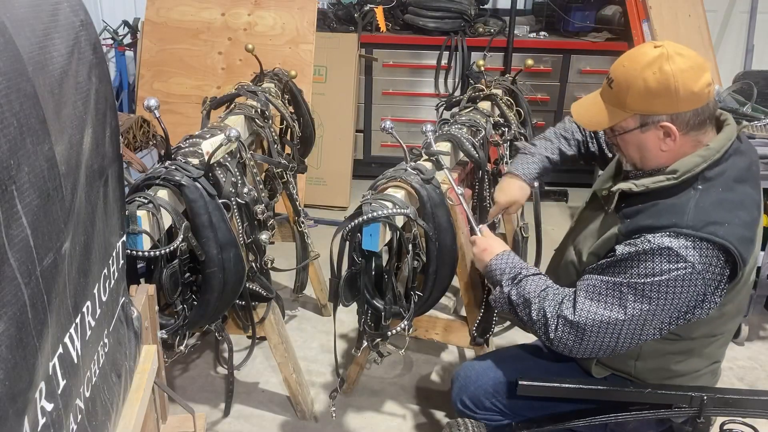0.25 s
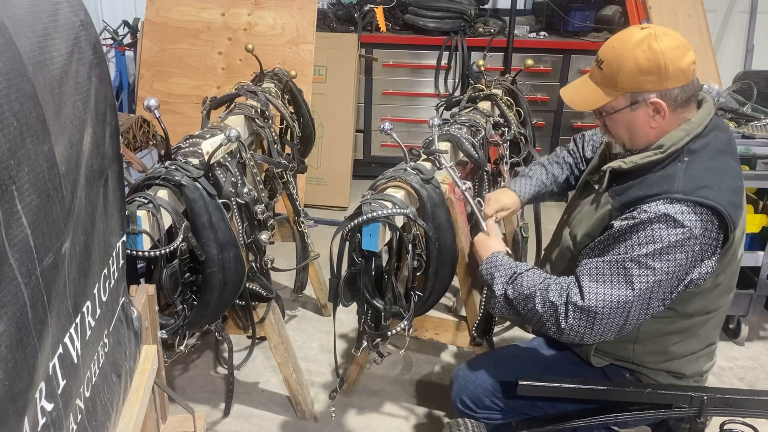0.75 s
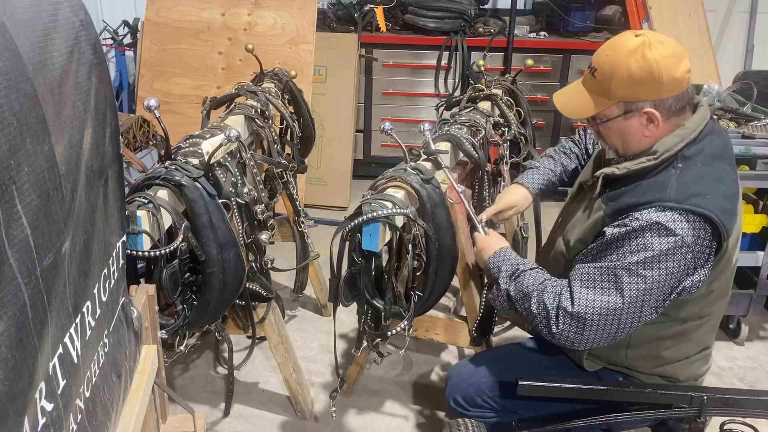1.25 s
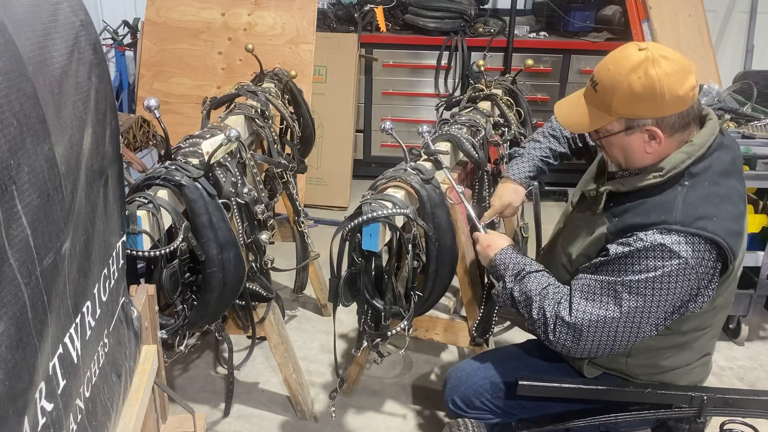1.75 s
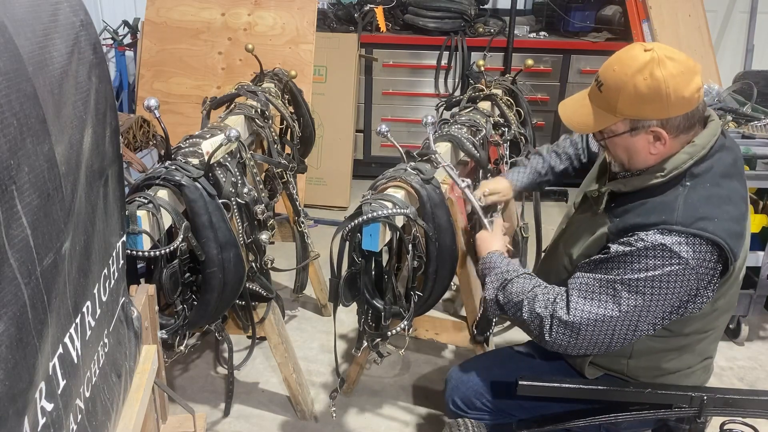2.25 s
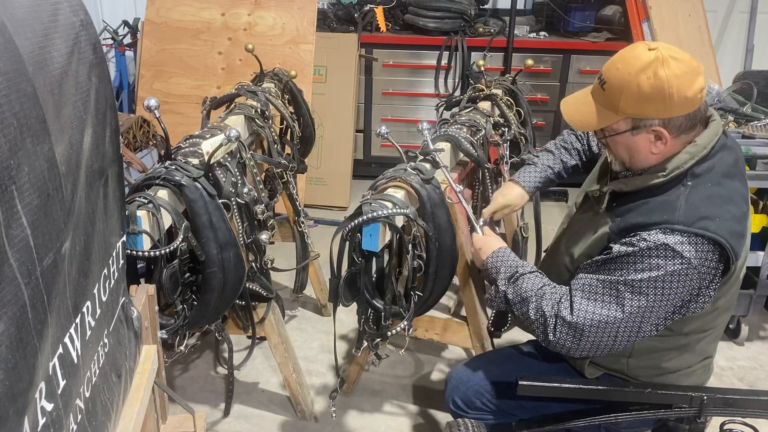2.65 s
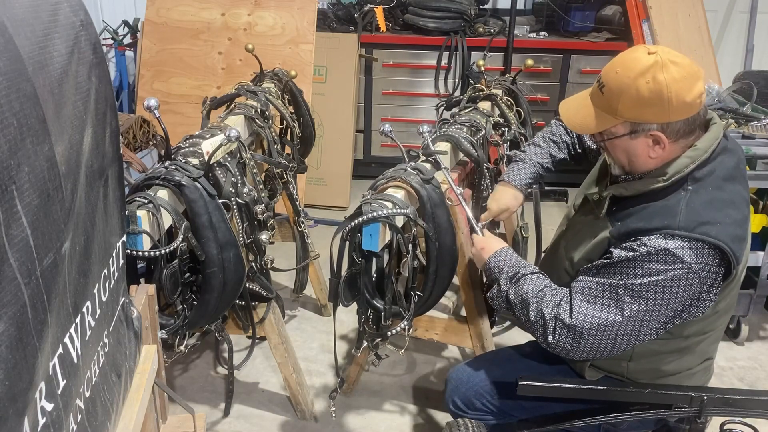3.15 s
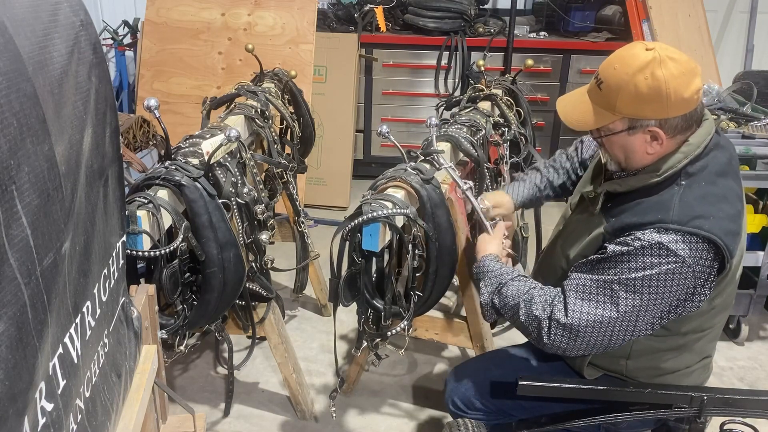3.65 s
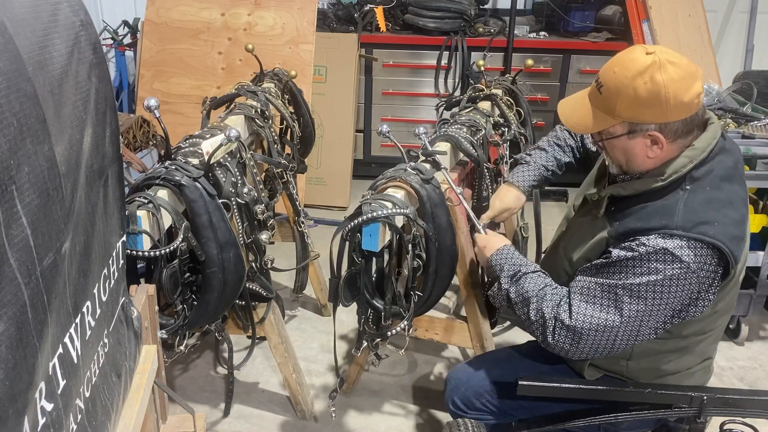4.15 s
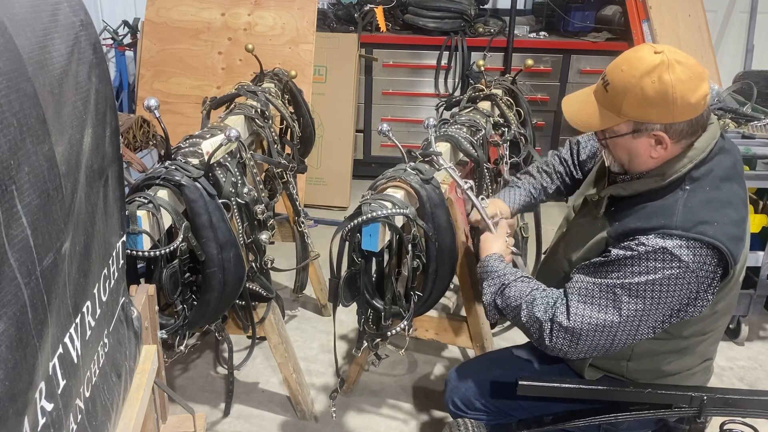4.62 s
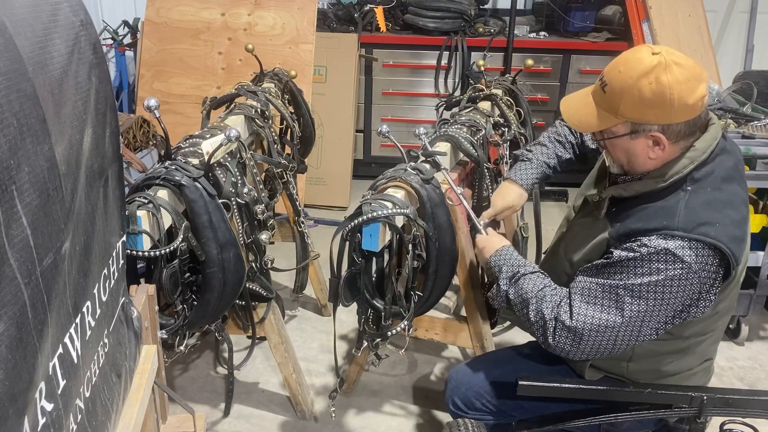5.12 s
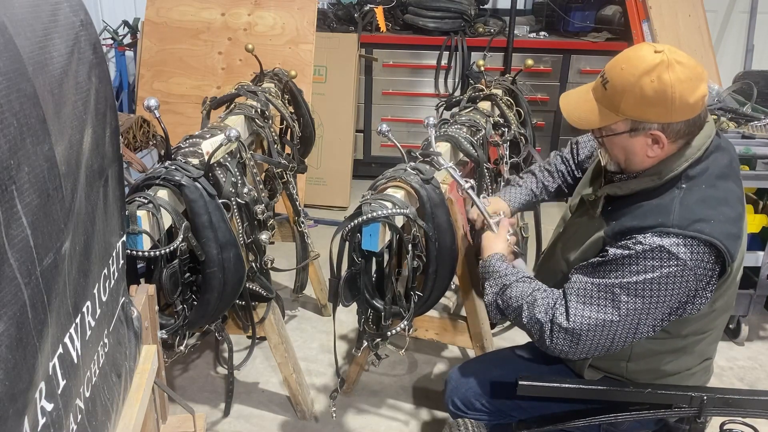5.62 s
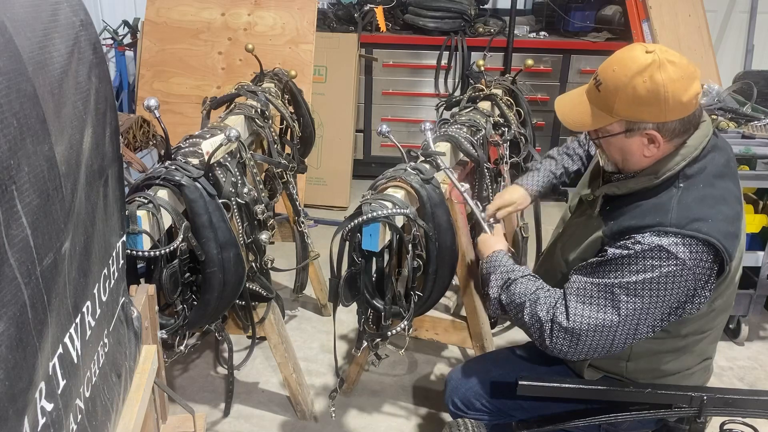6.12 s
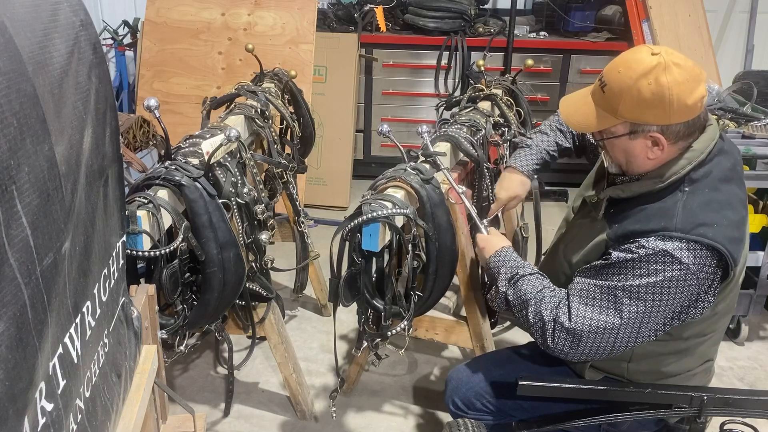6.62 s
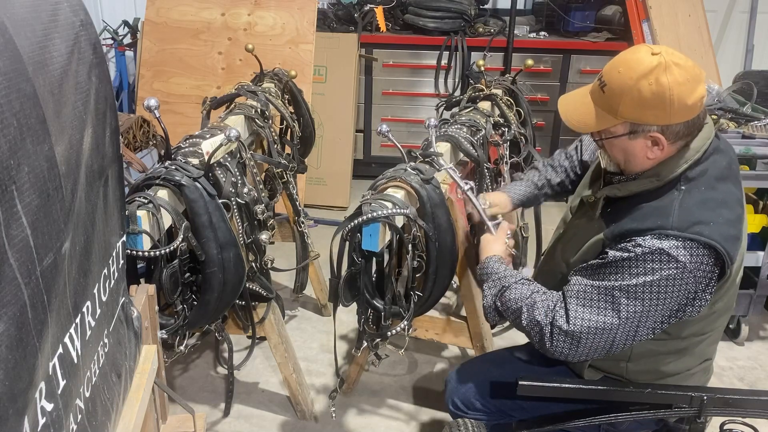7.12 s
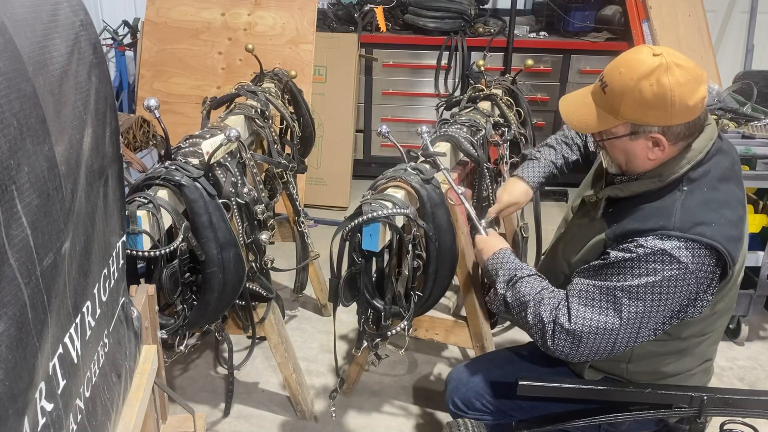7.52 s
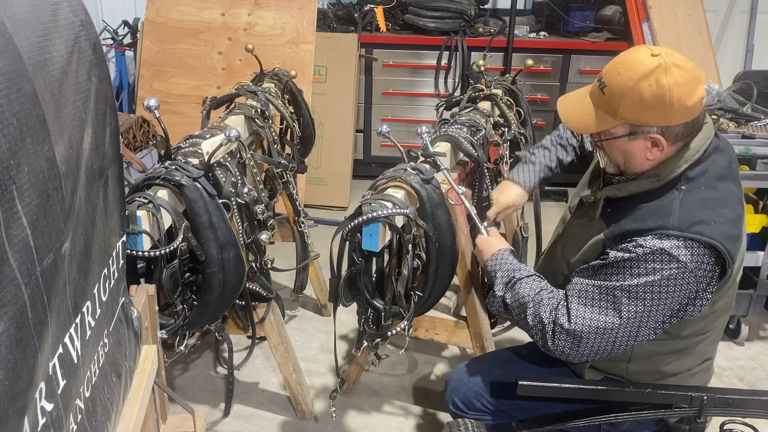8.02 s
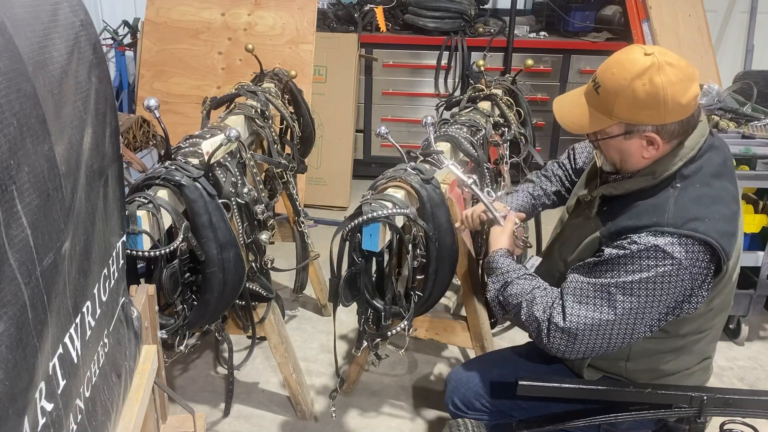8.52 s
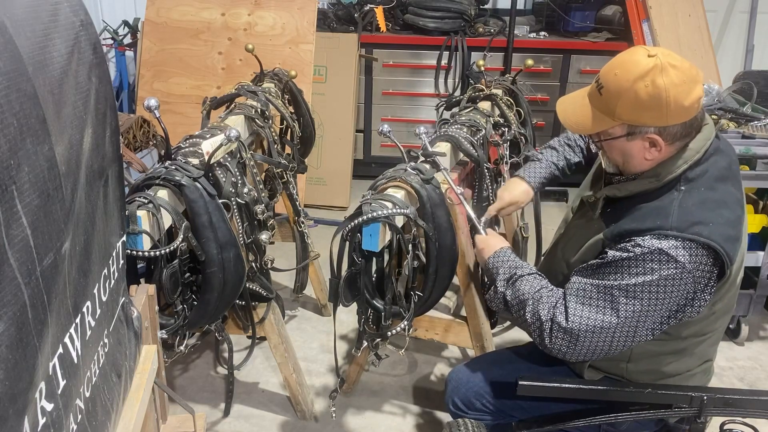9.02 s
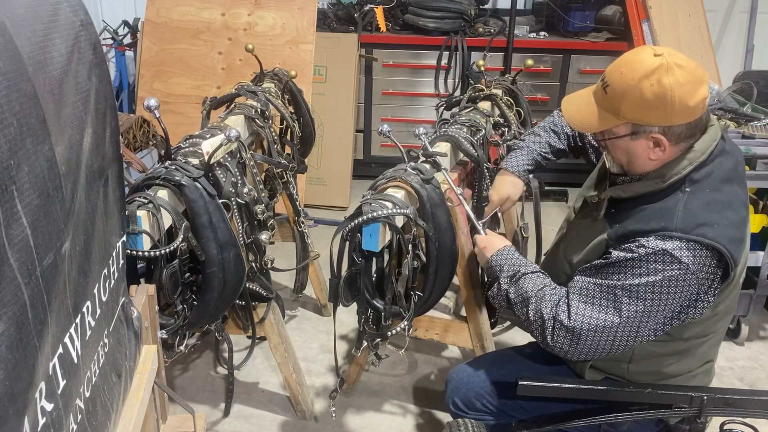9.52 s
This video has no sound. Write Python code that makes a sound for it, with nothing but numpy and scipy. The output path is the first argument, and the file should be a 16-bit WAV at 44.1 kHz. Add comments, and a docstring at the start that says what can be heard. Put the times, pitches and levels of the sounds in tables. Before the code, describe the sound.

Close-up handwork on a horse collar: bright, short spanner clacks with uneven gaps, double-click socket seatings, muffled knocks on leather and its wooden stand, and brief leather scrapes. A light, longer-ringing jingle interrupts early on. The strongest clacks come at the start, just after three, near six and at eight and a half seconds. Cloth rustle and quiet rumble stay underneath in a reflective room.

```python
"""Nuts are tightened on a horse collar with a socket and a spanner, in a workshop, for about ten seconds.
A steel clack (noise crack plus ringing modes) and a padded knock open it; a leather creak (gliding slips) follows.
Clacks, socket seatings, knocks and scrapes (swells of sparse noise) recur; a loose fitting jingles from 2.3 to 3.1 s.
Seatings end near 8.3 s, clacks near 9.4 s, knocks near 9.7 s. Faint ticks fall at random.
Rubbing sleeves and leather (grainy noise), a hard room's reflections and a low hush (shaped noise) run throughout."""
import sys
import numpy as np
from scipy import signal
from scipy.fft import rfft, irfft, next_fast_len
from scipy.io import wavfile
from scipy.ndimage import uniform_filter1d

SR = 44100
rng = np.random.default_rng(int(sys.argv[2]) if len(sys.argv) > 2 else 0)


def to_wav(sig):
    """Store sig (one row per channel, or 1-D mono) as 16-bit WAV at the path in sys.argv[1].

    Samples outside -1..1 are clipped; the rate is SR.
    """
    pcm = np.clip(np.atleast_2d(sig), -1, 1) * 32767
    pcm = np.round(pcm).astype(np.int16)
    wavfile.write(sys.argv[1], SR, pcm.T)  # frames by channels


N = 430416  # samples

# Event and mode levels are relative: the layer gains and the mix scale them.

# Spanner blows. Each row: start in seconds, crack energy in dB, spanner ring energy in dB, brightness in dB per octave,
# place struck as a fraction of the length, mode favoured by the blow's direction in Hz.
SPANNER_BLOWS = [(0.0285, 3, -2.5, 5, 0.062, 13200), (0.199, -19, -22.5, -3.5, 0.14, 3840),
                 (0.462, -4, -18, 1.5, .24, 9700), (0.73, -16.5, -19, 0, .44, 3840),
                 (0.9, 2, 2, 5.5, 0.439, 4060), (1.246, -14.5, -6.5, 0.5, 0.245, 7550),
                 (1.558, -19, -20, -5.5, .37, 4960), (1.657, -10, -13.5, 4.5, .35, 6820),
                 (1.838, -19, -18, -2, .48, 5940), (1.991, -1, -12, -.5, .18, 9730),
                 (3.2024, 3, -1, 3.5, 0.067, 10320), (4.0097, -13.5, -10, 0.5, 0.26, 6850),
                 (4.113, -20.5, -36, 4.5, .18, 9730), (4.314, -30.5, -22.5, -2, 0.2, 2900),
                 (4.323, -13, -15.5, -1, 0.083, 6860), (4.592, -13, -16.5, -1.5, 0.33, 5010),
                 (4.9487, -13, -9, 0, .35, 4850), (5.175, -19, -38, -0.5, .026, 2840),
                 (5.2978, -4, -8.5, 2, 0.1, 9630), (5.824, 4, 4.5, 8, 0.49, 5210),
                 (5.843, -9.5, -16, 11, 0.22, 5100), (5.923, -8, -9, -2, 0.21, 10000),
                 (6.013, -8.5, -1.5, 3.5, 0.14, 7260), (6.249, -32.5, -21, -4, 0.2, 4800),
                 (6.426, -17.5, -17.5, -1.5, 0.48, 3970), (6.692, -23, -31, -4.5, 0.45, 2680),
                 (6.902, -23.5, -36, 4, 0.32, 10800), (6.97, -19.5, -16.5, -2.5, .21, 10320),
                 (7.211, -19, -17.5, -0.5, .34, 11300), (7.3047, -16.5, -13.5, -3, 0.13, 6900),
                 (7.331, -19, -11, -0.5, 0.22, 4500), (7.387, -16.5, -11, -3.5, .32, 3860),
                 (7.445, -13, -15, -0.5, 0.52, 6660), (7.7355, -12.5, -35, -2.5, 0.18, 4590),
                 (7.741, -6.5, -9, 3.5, 0.13, 10600), (8.089, -27.5, -34, -2, 0.27, 5830),
                 (8.164, -20.5, -43, -0.5, .14, 10320), (8.478, -23, -28, -5.5, .13, 2680),
                 (8.513, -0.5, 3, 3.5, 0.287, 3860), (8.665, -10.5, -7, -0.5, 0.32, 2590),
                 (8.985, -20, -12.5, 0.5, 0.29, 4430), (9.382, -13, -19, -4, 0.32, 2900)]
# Socket put on a nut. Each row: seating time in seconds, socket ring energy in dB, time from touch to seating in seconds.
SOCKET_SEATINGS = [(0.77, -21.5, .003), (2.205, -5, 0.017), (3.595, -4.5, 0.02), (4.627, -15.5, 0.027),
                   (5.6012, -1.5, 0.0057), (5.789, -11, 0.0052), (7.006, -7.5, 0.011), (8.255, -11.5, .002)]
SOCKET_SHARE_DB = -16.5  # socket ring against crack
TOUCH_DB, SEAT_CRACK_DB, SEAT_SPANNER_DB = -7, -4.5, -13  # touch against seating; crack and spanner against socket ring
SEAT_CONTACT_S = 0.0024
FULL_CONTACT_S, LOOSEN_S_PER_DB = 0.0017, 0.00004  # lighter touches slide for longer


def tools():
    """The spanner strikes once per blow; the socket touches each nut, then seats harder."""
    out = np.zeros(N)
    for start_s, crack_db, spanner_db, bright_db, place, favoured_hz in SPANNER_BLOWS:
        contact_s = FULL_CONTACT_S + LOOSEN_S_PER_DB * max(-crack_db, 0)
        socket_db = crack_db + SOCKET_SHARE_DB
        add(out, start_s, clack(crack_db, spanner_db, socket_db, bright_db, place, favoured_hz, contact_s))
    for seat_s, seat_db, lead_s in SOCKET_SEATINGS:
        for start_s, ring_db in (seat_s - lead_s, seat_db + TOUCH_DB), (seat_s, seat_db):
            add(out, start_s, clack(ring_db + SEAT_CRACK_DB, ring_db + SEAT_SPANNER_DB, ring_db,
                                    bright_db=0.75, place=0.2, favoured_hz=4630, contact_s=SEAT_CONTACT_S))
    return out


# Spanner modes, in order. Each row: nominal frequency in Hz, level in dB, nominal t60 in seconds.
SPANNER_MODES = [(2682, -6, 0.12), (2926, -8, 0.039), (3258, -6, 0.033), (3855, -5.5, .1),
                 (4616, -3, 0.031), (4900, -1.5, 0.015), (5020, -13.5, 0.03), (5930, -8.5, .06),
                 (6906, -2.5, 0.037), (7090, 2, 0.063), (7340, -2.5, 0.062), (7996, -8, .04),
                 (9690, -2.5, 0.025), (9700, -13, .05), (11190, -1.5, 0.078), (10970, -3.5, 0.073),
                 (13340, -17.5, 0.047)]
# Socket modes. Each row: frequency in Hz, level in dB, t60 in seconds.
SOCKET_MODES = [(2560, -16, .04), (7600, -11, .03), (12560, -1, .04), (12670, 0, .06)]
# Steel contact spectrum. Each row: frequency in Hz, level in dB.
CRACK_SPECTRUM = [(100, -19), (300, -15), (1000, -4), (1800, -2), (2800, 0.5), (7000, 2.5), (10000, 4),
                  (13000, -3), (15500, -18.5)]


def clack(crack_db, spanner_db, socket_db, bright_db, place, favoured_hz, contact_s):
    """Steel on steel: a noise crack at the contact, then spanner and socket modes ring."""
    out = np.zeros(int(0.3 * SR))
    contact = burst(rise_s=0.59 * contact_s, decay_s=contact_s, rattle_db=-22, rattle_s=0.0083)
    crack = unit(colour(contact, CRACK_SPECTRUM, bright_db))

    # a mode struck on its node stays quiet
    mode_hz = np.transpose(SPANNER_MODES)[0]
    order = np.arange(len(SPANNER_MODES)) + 2
    node_db = 10 * np.log10(np.cos(np.pi * place * order) ** 2 + 0.022)
    favour_db = 14.3 * np.exp(-((mode_hz - favoured_hz) / 250) ** 2)
    tilt_db = bright_db * np.log2(mode_hz)

    # grip varies per blow: frequency within 0.6 %, t60 within 40 %
    grip = 1 + rng.uniform(-1, 1, (len(SPANNER_MODES), 3)) * [0.006, 0, 0.4]
    spanner = ring(SPANNER_MODES * grip, node_db + favour_db + tilt_db, scatter_db=3.5, length_s=0.25, beat_hz=30)
    socket = ring(SOCKET_MODES, 0, scatter_db=7.5, length_s=0.14, beat_hz=60)

    add(out, 0, undb(crack_db) * crack)
    add(out, 0.5 * contact_s, undb(spanner_db) * spanner)
    add(out, 0.5 * contact_s, undb(socket_db) * socket)
    return out


# Touches on the loose fitting. Each row: start in seconds, energy in dB.
FITTING_TOUCHES = [(2.303, -10), (2.391, -18.5), (2.473, -10), (2.571, 4), (2.595, 2), (2.806, -6),
                   (2.828, -3.5), (2.87, -0.5), (3.109, -4.5)]
# Loose fitting modes. Each row: frequency in Hz, level in dB, t60 in seconds.
FITTING_MODES = [(2110, -9, .25), (4565, -19, .3), (4917, -2.5, .35), (5667, -2, .4), (6901, -14, .25),
                 (7533, -7, .6), (8549, 0, .3), (8665, -7, .25), (9057, -1, .25), (9717, -13, .2),
                 (13450, -22, .35), (14030, -19, .35), (15050, -25, .35)]


def fitting():
    """A freely hanging steel piece rings long after each light touch, its modes beating in close pairs."""
    out = np.zeros(N)
    for start_s, touch_db in FITTING_TOUCHES:
        tone = ring(FITTING_MODES, 0, scatter_db=1.0, length_s=0.75, beat_hz=23)
        contact = burst(rise_s=0.0044, decay_s=0.0043, rattle_db=-16.5, rattle_s=0.027)
        add(out, start_s, undb(touch_db) * tone * build_up(len(tone), 0.0011))  # a graze builds up
        add(out, start_s, undb(touch_db - 17) * unit(colour(contact, CRACK_SPECTRUM)))
    # trembling delay blurs the tones
    sway_s = 0.00001 * walk(70)
    samples = np.arange(N)
    return undb(-7.5) * np.interp(samples + sway_s * SR, samples, out)


# Collar knocks. Each row: start in seconds, wooden ring energy in dB, centre in Hz, leather slap energy in dB.
COLLAR_KNOCKS = [(0.029, -13, 657, -10), (1.287, -13, 240, -16), (1.561, -19, 1040, -17.5),
                 (1.662, -11.5, 1220, -17), (1.994, -15.5, 900, -11.5), (2.384, -21, 560, -33.5),
                 (2.826, -14, 668, -12), (2.949, -19, 600, -27), (3.663, -16.5, 540, -30),
                 (3.987, -16.5, 240, -23), (4.079, -20, 650, -21.5), (4.348, -26, 328, -28.5),
                 (4.857, -19.5, 640, -27), (5.805, -11.5, 560, -14), (5.834, -10, 1330, -9.5),
                 (7.027, -7.5, 820, -21), (7.06, -15.5, 400, -31), (8.08, -25.5, 400, -37),
                 (8.569, -25, 1120, -25), (9.14, -24.5, 786, -28), (9.371, -28, 1390, -23),
                 (9.395, -19.5, 720, -33), (9.691, -19.5, 690, -21)]
# Collar and wooden stand modes. Each row: frequency in Hz, level in dB, t60 in seconds.
STAND_MODES = [(174, -10.5, 0.25), (248.3, -3.5, 0.43), (324, -0.5, 0.099), (404.4, -6, .08),
               (530, -7.5, 0.06), (645, -2, 0.14), (788.3, 0.5, 0.3), (1045, -4, 0.093), (1184, -4, 0.11),
               (1283, 0, 0.033), (1660, -15.5, 0.045)]
# Thud spectrum. Each row: multiple of the knock's centre, level in dB.
THUD_SPECTRUM = [(.08, -8.5), (.3, -12.5), (1, 2), (1.8, -13.5), (3.2, -15), (7, -24.5), (20, -56)]
# Leather slap spectrum. Each row: frequency in Hz, level in dB.
SLAP_SPECTRUM = [(150, -19), (450, -8), (700, 1.5), (1200, 1.5), (1600, -3), (2500, -15.5), (7000, -36.5)]
THUD_DB = -6  # against the wooden ring


def collar():
    """Padded blows on the stand: a dull thud, a leather slap and the wooden modes nearest the blow's centre."""
    out = np.zeros(N)
    for start_s, wood_db, centre_hz, slap_db in COLLAR_KNOCKS:
        octaves_away = np.abs(np.log2(np.transpose(STAND_MODES)[0] / centre_hz))
        wood = ring(STAND_MODES, -6 * octaves_away, scatter_db=2.0, length_s=0.3, beat_hz=21)
        wood = wood * build_up(len(wood), 0.0011)  # padding softens the attack
        push = burst(rise_s=0.01, decay_s=0.0085, rattle_db=-30.0, rattle_s=0.099)
        thud = unit(colour(push, np.array(THUD_SPECTRUM) * [centre_hz, 1]))
        hit = burst(rise_s=0.0034, decay_s=0.013, rattle_db=-28.5, rattle_s=0.02)
        slap = unit(colour(hit, SLAP_SPECTRUM))
        add(out, start_s, undb(wood_db) * wood)
        add(out, start_s, undb(wood_db + THUD_DB) * thud)
        add(out, start_s, undb(slap_db) * slap)
    return out


# Steel scraping leather. Each row: start in seconds, length in seconds, energy in dB, centre in Hz.
LEATHER_SCRAPES = [(1.49, 0.061, -18, 1500), (3.44, 0.028, -14, 1530), (4.467, 0.082, -18, 1850),
                   (6.725, 0.046, -20.5, 1500), (6.924, 0.036, -20.5, 1510), (8.168, 0.056, -21.5, 1740),
                   (9.331, 0.085, -16, 1610)]
# Scrape spectrum. Each row: multiple of the scrape's centre, level in dB.
RASP_SPECTRUM = [(.1, -22.5), (.55, -4.5), (1, 4), (1.4, -6.5), (2.5, -7), (8, -27)]


def scrapes():
    """A tool drags over leather: a short swell of fine catches, made of cubed noise."""
    out = np.zeros(N)
    for start_s, length_s, scrape_db, centre_hz in LEATHER_SCRAPES:
        t = seconds(0.2)
        swell = np.sin(np.pi * np.minimum(t / length_s, 1))
        catches = rng.standard_normal(len(t)) ** 3  # cubing makes them sparse
        rasp = unit(colour(swell * catches, np.array(RASP_SPECTRUM) * [centre_hz, 1]))
        add(out, start_s, undb(scrape_db) * rasp)
    return out


# Leather creak path. Each row: time in seconds, slip rate in Hz, level in dB.
CREAK_PATH = [(.24, 560, -80), (.27, 545, -52), (.305, 530, -47), (.335, 465, -45), (.355, 420, -62),
              (.39, 400, -85)]


def leather():
    """Leather sticks and slips on the collar: three harmonics of a falling, jittering slip rate."""
    path_s, *columns = np.transpose(CREAK_PATH)
    t = np.arange(N) / SR
    slip_hz, level_db = (np.interp(t, path_s, column) for column in columns)
    phase = 2 * np.pi * np.cumsum(slip_hz * (1 + 0.025 * walk(250))) / SR
    slips = np.sin(phase) + undb(-8) * np.sin(2 * phase) + undb(-17) * np.sin(3 * phase)
    sounding = (t > path_s[0]) * (t < path_s[-1])
    return slips * undb(level_db + 2 * walk(123)) * sounding


# Handling. Each row: time in seconds, sleeve rub level in dB, shifting leather level in dB.
HANDLING = [(0.0, -49, -65), (0.32, -61, -46), (0.59, -58, -66), (0.91, -44.5, -67.5), (1.43, -60, -63.5),
            (2.26, -58, -57.5), (3.5, -52, -68), (3.83, -63.5, -61), (5.66, -51.5, -67), (5.82, -47, -77),
            (5.96, -48.5, -55), (6.55, -61, -72.5), (7.31, -60, -59.5), (7.84, -54, -75),
            (8.55, -52.5, -54.5), (8.65, -61, -53.5), (9.11, -65.5, -75.5), (9.68, -60, -67)]
# Sleeve rub spectrum. Each row: frequency in Hz, level in dB.
CLOTH_SPECTRUM = [(100, -17), (400, -7), (1200, -7.5), (3000, -1.5), (7000, -8), (12000, -17),
                  (15500, -38.5)]
# Shifting leather spectrum. Each row: frequency in Hz, level in dB.
LEATHER_SPECTRUM = [(80, -5.5), (200, -4.5), (400, 4), (700, -2), (1200, -0.5), (2000, -14.5), (6000, -34)]
SLEEVE_GAIN_DB, LEATHER_GAIN_DB = -8.5, -2.5


def sleeves():
    """Sleeves brush the harness and leather shifts under the hands: two bands of friction noise."""
    path_s, *columns = np.transpose(HANDLING)
    cloth_db, leather_db = (np.interp(np.arange(N) / SR, path_s, column) for column in columns)
    cloth = rubbing(cloth_db + SLEEVE_GAIN_DB, CLOTH_SPECTRUM, grain_db=6.5, stroke_db=3.5)
    shifting = rubbing(leather_db + LEATHER_GAIN_DB, LEATHER_SPECTRUM, grain_db=7.5, stroke_db=0.5)
    return cloth + shifting


def rubbing(level_db, spectrum, grain_db, stroke_db):
    """Friction: fast-varying noise grains under slower, uneven strokes."""
    grains = colour(rng.standard_normal(N) * undb(grain_db * walk(400)), spectrum)
    return unit(grains) * np.sqrt(N) * undb(level_db + stroke_db * walk(18))


TICKS_PER_S, TICK_DB, TICK_SPREAD_DB = 2.2, -30, 2.5


def ticks():
    """Buckles and tools touch faintly at random moments: small, dull clacks."""
    out = np.zeros(N)
    for when, size, place in rng.random((int(TICKS_PER_S * N / SR), 3)):
        tick_db = TICK_DB + TICK_SPREAD_DB * (2 * size - 1)
        add(out, when * N / SR, clack(tick_db, tick_db - 11, tick_db + SOCKET_SHARE_DB, bright_db=-6,
                                      place=place / 2, favoured_hz=3860, contact_s=0.0025))
    return out


# Room hush spectrum. Each row: frequency in Hz, level in dB.
HUSH_SPECTRUM = [(20, -11), (42, 0.5), (65, 3), (130, -5), (300, -7), (700, -12.5), (1500, -20),
                 (4000, -28), (10000, -26), (16000, -43)]
HUSH_DB = -66  # mean level; wanders slightly


def hush():
    """Low, nearly steady room noise: shaped white noise."""
    noise = unit(colour(rng.standard_normal(N), HUSH_SPECTRUM)) * np.sqrt(N)
    return noise * undb(HUSH_DB + 0.56 * walk(9))


# Workshop decay. Each row: frequency in Hz, t60 in seconds.
ROOM_DECAY = [(150, 0.39), (700, 0.68), (2200, 0.73), (5500, 0.56), (9000, 0.47), (14000, 0.31)]
# Reflection colour; clutter and leather soak up treble. Each row: frequency in Hz, level in dB.
REFLECTION_COLOUR = [(200, 3), (1200, 1), (4000, 0), (8000, -0.9), (13000, -1)]


def workshop(x, wet_db):
    """Dense reflections from floor, walls and clutter: a noise tail whose bands each decay at their own rate."""
    t = seconds(0.91)
    noise = rfft(rng.standard_normal(len(t)))
    hz = np.arange(len(noise)) * SR / len(t)
    centres_hz = np.geomspace(100, 16000, 12)
    tail = 0
    for centre_hz, share in zip(centres_hz, np.eye(len(centres_hz))):
        band = irfft(noise * on_log_axis(hz, np.c_[centres_hz, share]), len(t))
        decay = np.exp(-np.log(1000) * t / on_log_axis(centre_hz, ROOM_DECAY))
        tail = tail + undb(on_log_axis(centre_hz, REFLECTION_COLOUR)) * band * decay
    tail = unit(tail * (1 - np.exp(-(t / 0.0024) ** 2)))
    return x + undb(wet_db) * signal.fftconvolve(x, tail)[:N]


def undb(db):
    """Decibels to gain."""
    return 10 ** (np.asarray(db) / 20)


def unit(x):
    """Scale to an energy of one."""
    return x / np.sqrt(np.sum(x ** 2) + 1e-18)


def seconds(length_s):
    """Time axis of the given length."""
    return np.arange(int(length_s * SR)) / SR


def add(track, start_s, sound):
    """Mix a sound into a track."""
    i = max(int(start_s * SR), 0)
    track[i:i + len(sound)] += sound[:N - i]


def build_up(size, rise_s):
    """Exponential onset from zero to one."""
    return 1 - np.exp(-np.arange(size) / SR / rise_s)


def on_log_axis(hz, points):
    """Interpolate (Hz, value) points over log frequency."""
    points_hz, value = np.transpose(points)
    return np.interp(np.log(hz + 1), np.log(points_hz), value)


def colour(x, points, slope_db=0):
    """Minimum-phase filter with the given spectrum, tilted in dB per octave above 1 kHz."""
    size = next_fast_len(len(x) + 2048, True) * 2
    hz = np.arange(size // 2 + 1) * SR / size
    db = on_log_axis(hz, points) + slope_db * np.log2(np.maximum(hz / 1000, 1))
    # fold the cepstrum: causal response
    cepstrum = irfft(np.log(undb(db)))
    cepstrum[1:size // 2] *= 2
    cepstrum[size // 2 + 1:] = 0
    return irfft(rfft(x, size) * np.exp(rfft(cepstrum)))[:len(x)]


def ring(modes, extra_db, scatter_db, length_s, beat_hz=0):
    """Decaying modes as beating pairs, their levels scattered at random per blow."""
    hz, db, t60_s = np.transpose(modes)[:, :, None]
    t = seconds(length_s)
    size, phase, split = rng.standard_normal((3, len(modes), 1))
    gain = undb(db + np.reshape(extra_db, (-1, 1)) + scatter_db * size) / np.sqrt(t60_s)
    main = np.sin(2 * np.pi * (hz * t + phase))
    partner = 0.5 * np.sin(2 * np.pi * ((hz + beat_hz * split) * t + phase))
    decay = np.exp(-np.log(1000) * t / t60_s)
    return unit(np.sum(gain * decay * (main + partner), axis=0))


def burst(rise_s, decay_s, rattle_db, rattle_s):
    """A contact: a quick noise flurry of tiny impacts, then a weaker rattle."""
    t = seconds(0.2)
    flurry = np.exp(-t / decay_s)
    rattle = undb(rattle_db) * np.exp(-t / rattle_s)
    return (1 - np.exp(-t / rise_s)) ** 2 * (flurry + rattle) * rng.standard_normal(len(t))


def walk(rate_hz):
    """Smoothed random wandering with a spread near one."""
    k = int(SR / rate_hz)
    steps = np.repeat(rng.standard_normal(N // k + 1), k)
    return np.sqrt(2) * uniform_filter1d(uniform_filter1d(steps, k), k)[:N]


def scene():
    """Steel, fitting and dull sounds each excite the room; the hush is added dry."""
    steel = workshop(undb(-1.5) * (tools() + ticks()), wet_db=1.29)
    jingle = workshop(fitting(), wet_db=3.5)
    dull = workshop(collar() + leather() + sleeves() + undb(-2.5) * scrapes(), wet_db=0.0)
    return (steel + jingle + undb(-3.5) * dull + hush())[None]


TOP_HZ = 15900


def record(dry):
    """A steep low-pass cuts the top."""
    return signal.sosfilt(signal.ellip(8, 0.2, 70, TOP_HZ, fs=SR, output="sos"), dry)


dry = scene()
out = record(dry)
to_wav(out)
```